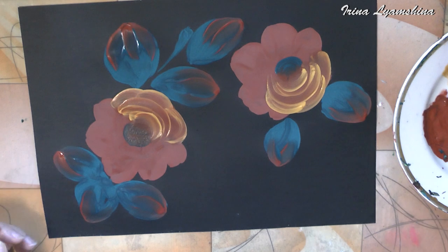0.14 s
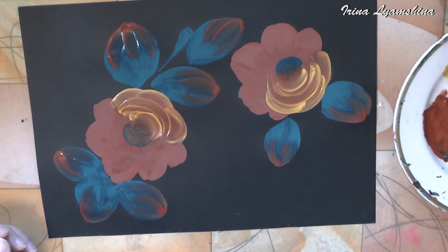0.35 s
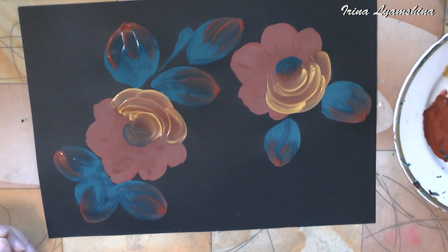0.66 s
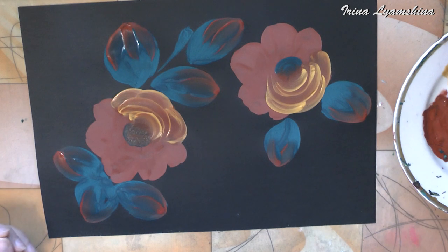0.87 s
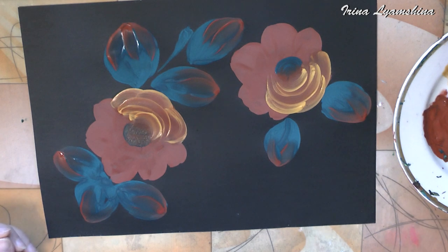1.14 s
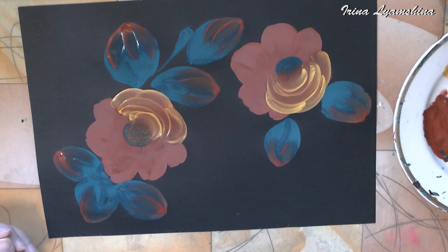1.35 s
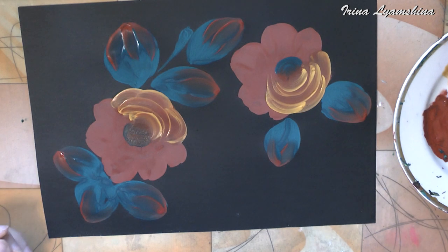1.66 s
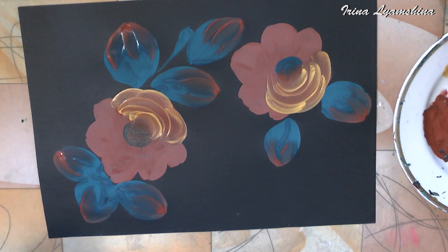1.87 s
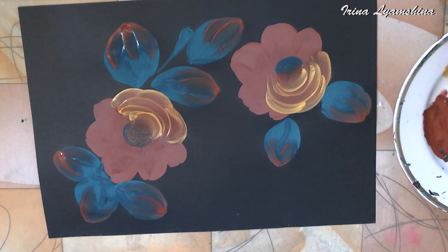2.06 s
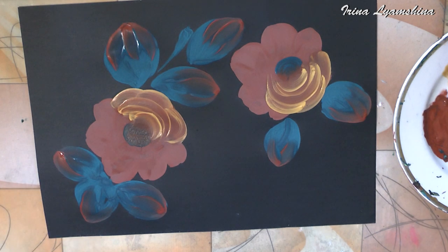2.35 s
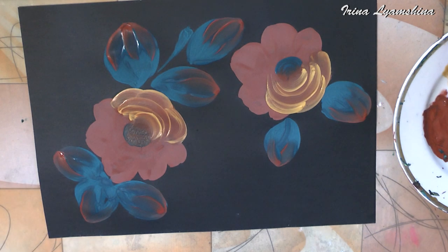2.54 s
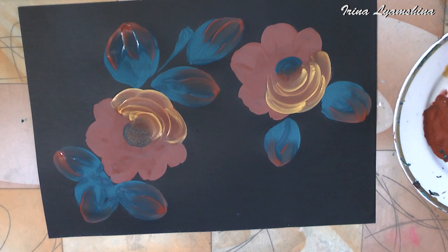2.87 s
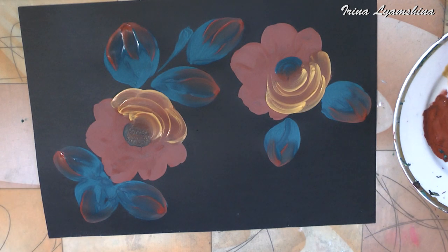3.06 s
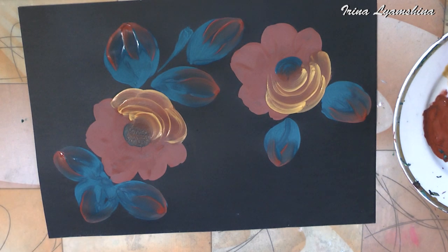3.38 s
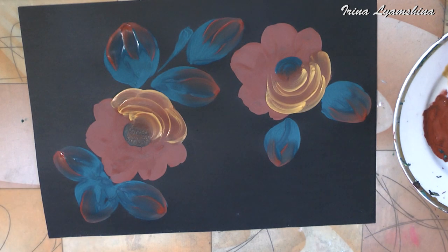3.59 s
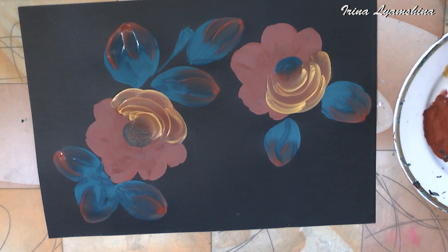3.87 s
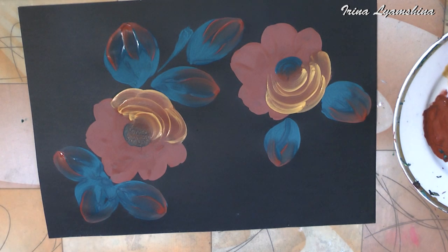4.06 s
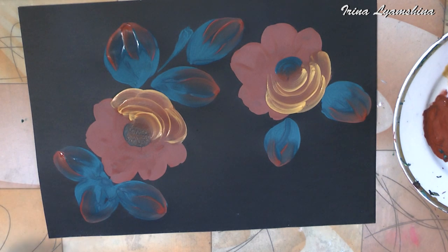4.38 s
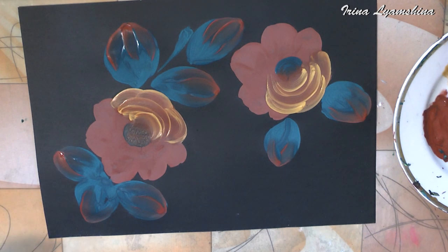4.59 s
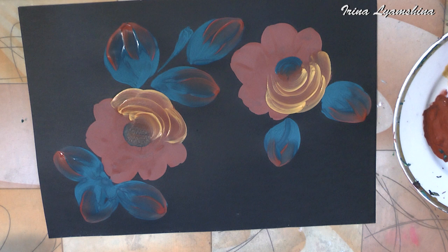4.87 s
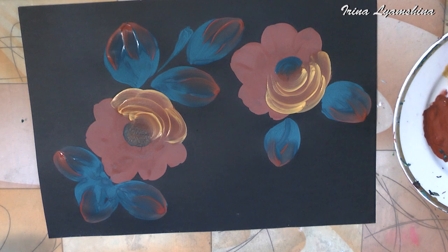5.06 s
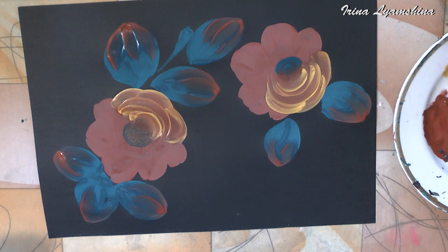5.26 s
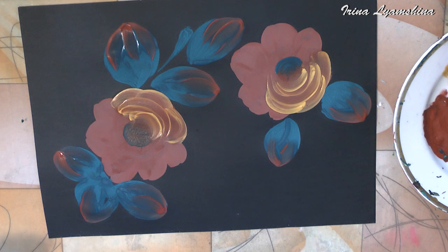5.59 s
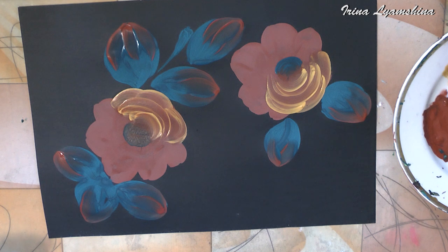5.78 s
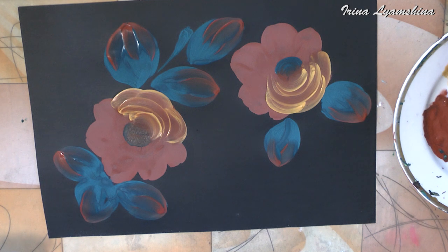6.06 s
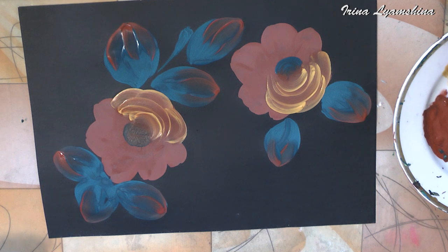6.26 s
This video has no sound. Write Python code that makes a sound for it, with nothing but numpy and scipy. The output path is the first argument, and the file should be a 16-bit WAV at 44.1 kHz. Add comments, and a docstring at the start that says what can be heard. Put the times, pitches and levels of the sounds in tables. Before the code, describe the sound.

Brush stirring water in a ringing jar, bristles scraping and the ferrule cracking on glass, a hand brushing paper, then a gentler second swish.

```python
"""At a desk in a small quiet room, a paintbrush is swished in a jar of water.
Slaps trap air pockets: short rising sines that plop or plink and ring the jar's modes; churned water is many more.
Droplets tick as pitched noise, bristles scrape in resonant clicks, and the ferrule knocks, scattering fine drops.
A hand slides over paper as banded noise, the desk top thuds at its low modes, and the room hums faintly below."""
import sys
import numpy as np
from scipy import signal
from scipy.io import wavfile
from scipy.ndimage import uniform_filter1d

SR = 44100
rng = np.random.default_rng(int(sys.argv[2]) if len(sys.argv) > 2 else 0)


def transcribe(u):
    """Save the signal u as a 16-bit wav file named by the first command-line argument.

    u: samples, shape (n,) or (channels, n), limited to [-1, 1]; the rate is SR.
    q: integer samples, one column per channel.
    """
    v = np.clip(np.atleast_2d(u).T, -1, 1)
    q = np.round(v * 32767).astype(np.int16)
    wavfile.write(sys.argv[1], SR, q)


N = 283563
GRAIN_SAMPLES = 640   # length of one pocket or tick
OPPOSED = np.array([[1], [-1]])   # signs in the left and right channels

# Ferrule hard on the glass. Each row: start in seconds, level in dB.
KNOCKS = [(1.1236, -22.5), (1.698, -4.5), (4.639, -31)]
# Vigour of the stirring hand, as churned water. Each row: time in seconds, level in dB.
STIR = [(0.0, -70), (.5, -68), (.91, -52), (1.32, -44.5), (1.48, -64.5), (1.77, -48.5), (1.9, -61.5),
        (2.08, -47), (2.2, -53), (2.69, -66.5), (3.37, -73), (4.21, -58), (4.33, -54.5), (4.78, -51),
        (5.07, -52.5), (5.16, -91), (5.3, -71), (5.34, -46), (5.4, -61), (5.44, -47), (5.49, -63),
        (5.75, -66), (6.43, -82)]


def amp(db):
    """Amplitude ratio of a level in dB."""
    return 10 ** (np.asarray(db) / 20)


def rms_one(x):
    """Scale to rms 1."""
    return x / np.sqrt(np.mean(x ** 2) + 1e-20)


def in_time(rows, **ends):
    """Interpolate each column of a table over the scene's samples; the first column is seconds."""
    times_s, *columns = np.transpose(rows)
    return [np.interp(np.arange(N) / SR, times_s, column, **ends) for column in columns]


def in_spans(tables):
    """Gain of a sound that follows its tables and drops at once to -120 dB outside them."""
    return sum(amp(in_time(rows, left=-120, right=-120)[0]) for rows in tables)


def at_hz(points, hz):
    """Interpolate a spectrum on a log frequency axis."""
    points_hz, values = np.array(points).T
    return np.interp(np.log(hz), np.log(points_hz), values)


def resonate(x, hz, width_hz):
    """Two-pole resonance with gain 1 on top."""
    r = np.exp(-np.pi * width_hz / SR)
    zeros = [(1 - r * r) / 2, 0, (r * r - 1) / 2]
    poles = [1, -2 * r * np.cos(2 * np.pi * hz / SR), r * r]
    return signal.lfilter(zeros, poles, x + 1e-18)


def bandpass(x, low_hz, high_hz):
    """Second-order Butterworth band-pass."""
    return signal.sosfilt(signal.butter(2, [low_hz, high_hz], "band", fs=SR, output="sos"), x)


def late(x, delay_s):
    """Delay a signal."""
    return np.pad(x, (round(delay_s * SR), 0))[:N]


def add(out, start_s, sound):
    """Mix in a short sound."""
    i = round(start_s * SR)
    out[i:i + len(sound)] += sound[:N - i]


def banded_noise(spectrum):
    """Third-octave bands of stereo noise, each with its own level and left-right likeness; rms 1."""
    # Each row: frequency in Hz, left-right likeness from 0 to 1.
    likeness = [(60, 0.71), (300, 0.25), (1200, 0.012), (3000, 0.41), (5500, 1), (8500, 0.82),
                (13000, 0.23)]
    out, edges_hz = 0, 22 * 2 ** (np.arange(30) / 3)
    white = rng.standard_normal((2, 2, N))
    for k, (low_hz, high_hz) in enumerate(zip(edges_hz, edges_hz[1:])):
        if high_hz < spectrum[0][0]:
            continue
        mid, side = bandpass(white[k % 2], low_hz, high_hz)   # neighbouring bands use different noise
        hz = np.sqrt(low_hz * high_hz)
        alike = at_hz(likeness, hz)
        stereo = np.sqrt(1 + alike) * mid + np.sqrt(1 - alike) * side * OPPOSED
        out = out + amp(at_hz(spectrum, hz)) * stereo
    return rms_one(out)


def room_tone():
    """Steady noise floor of the room, shaped in bands."""
    # Each row: frequency in Hz, density in dB per Hz (relative).
    spectrum = [(25, -18), (103, -0.5), (238, 2.5), (399, -8), (553, -2.5), (726, -24), (900, -23),
                (1430, -11), (2900, -13), (5000, -17.5), (9000, -18.5), (13000, -21), (16500, -22)]
    return amp(-54.5) * banded_noise(spectrum)


def hum():
    """Appliance tones: steady sines with narrow noise on them, so that they waver in level."""
    # Each row: frequency in Hz, level in dB, noise width in Hz.
    tones = [(98.3, -63.5, 4.5), (727, -72, 5.8)]
    t, out = np.arange(N) / SR, 0
    for hz, db, width_hz in tones:
        narrow = resonate(resonate(rng.standard_normal(N), hz, width_hz), hz, 3 * width_hz)
        out = out + amp(db) * rms_one(np.sin(2 * np.pi * hz * t) + 0.59 * rms_one(narrow))
    return out


def shaking():
    """Level of the desk top in dB: a tremble that follows the stirring, with a quick rise and fall at each bump."""
    # The jar bumps the desk top. Each row: time in seconds, level in dB.
    thuds = [(0.791, -42.5), (1.143, -39), (1.207, -40.5), (1.305, -38.5), (1.47, -52.5), (1.661, -48.5),
             (2.061, -40.5), (2.147, -34.5), (2.47, -49), (2.92, -49.5), (4.573, -39.5), (4.651, -44.5),
             (4.916, -44), (5.322, -52), (5.8, -52), (6.0, -53)]
    rise_db_per_s, fall_db_per_s = 537, 264
    t = np.arange(N) / SR
    gain = amp(in_time(STIR)[0] - 4)
    for peak_s, db in thuds:
        drop_db = np.maximum(rise_db_per_s * (peak_s - t), fall_db_per_s * (t - peak_s))
        gain = np.maximum(gain, amp(db - drop_db))
    return 20 * np.log10(gain)


def desk(level_db, water):
    """The shaken desk top answers at its low modes, harder at every slap; a shove rumbles lower."""
    # Each row: frequency in Hz, width in Hz, level in dB.
    modes = [(212.8, 41.6, 2), (250.8, 79, -2), (584, 40, -3.5), (729, 29.4, -1.5)]
    # Low rumble, one table per shove. Each row: time in seconds, level in dB.
    shoves = [
        [(3.6, -86), (3.692, -61), (3.85, -80)],
        [(4.05, -68), (4.182, -44), (4.4, -50.5), (4.75, -64)],
    ]
    shake, thud = rng.standard_normal((3, N)), 0
    drive = shake[0] + 0.32 * shake[1:]   # a common part and one per channel
    for hz, width_hz, db in modes:
        thud = thud + amp(db) * resonate(resonate(drive, hz, width_hz), hz, 2 * width_hz)
    jolt = uniform_filter1d(np.abs(resonate(water, 850, 770)), 600)
    rumble = rms_one(bandpass(shake[0] + 0.3 * shake[1:], 42, 95))
    return (amp(level_db) + 0.23 * jolt) * rms_one(thud) + in_spans(shoves) * rumble


def paper_slide():
    """A hand rubs over paper: banded noise under a moving level."""
    # One table per slide. Each row: time in seconds, level in dB.
    strokes = [
        [(0.0, -52), (0.124, -53.5), (0.25, -107)],
        [(2.1, -58.5), (2.464, -50.5), (2.624, -51), (2.78, -99)],
        [(3.62, -113), (3.678, -60.5), (3.992, -50.5), (4.3, -66)],
    ]
    # Each row: frequency in Hz, density in dB per Hz (relative).
    spectrum = [(700, -70), (1500, -9), (3000, -2), (7000, -2), (12000, -2.5), (16000, -17)]
    return in_spans(strokes) * banded_noise(spectrum)


def scrape():
    """Bristles on glass slip in uneven clicks; each stiff resonance catches and lets go in its own time."""
    # One table per scrape. Each row: time in seconds, level in dB.
    strokes = [
        [(0.66, -56), (0.685, -40), (0.77, -67), (0.8, -49.5), (0.89, -50), (1.12, -59)],
        [(1.13, -43), (1.4, -81)],
        [(3.31, -86), (3.55, -65), (3.75, -76)],
    ]
    # Each row: frequency in Hz, width in Hz, level in dB.
    bristles = [(3290, 38, 15.5), (4620, 50, 13.5), (4800, 66, 13.5), (6510, 250, 3), (7850, 3900, -9)]
    slips_per_s = 3000
    slips = (rng.random(N) < slips_per_s / SR) * rng.standard_normal(N)
    out = 0
    for hz, width_hz, db in bristles:
        grip = amp(4.4 * rms_one(resonate(rng.standard_normal(N), 14, 24)))
        out = out + amp(db) * resonate(slips * grip, hz, width_hz)
    return in_spans(strokes) * rms_one(out)


def pocket(hz, cycles, rise):
    """An air pocket swells and dies within a few cycles; a positive rise makes its pitch climb as it closes."""
    turns = np.arange(GRAIN_SAMPLES) * hz / SR
    swell = turns / cycles * np.exp(1 - turns / cycles)
    return swell * np.sin(2 * np.pi * turns * (1 + rise * turns))


def knocks():
    """Metal on glass: a broad crack of a few fast swings over a low push."""
    crack = pocket(3900, cycles=1.7, rise=0) + 0.51 * pocket(2230, cycles=1.96, rise=0)
    push = 0.029 * pocket(144, cycles=0.56, rise=0)
    out = np.zeros(N)
    for start_s, db in KNOCKS:
        add(out, start_s, amp(db) * (crack + push))
    return out


def spatter():
    """Water thrown up by each knock falls back in tiny drops of every pitch, thinning out."""
    level_db, t60_s = -25, 0.16
    out = np.zeros(N)
    for start_s, db in KNOCKS:
        for wait, pitch, size in rng.random((60, 3)):
            wait_s = 0.003 + 0.08 * wait ** 2
            drop = 2 * size * pocket(1500 * 6.0 ** pitch, cycles=2.1, rise=0)
            add(out, start_s + wait_s, amp(db + level_db - 60 * wait_s / t60_s) * drop)
    return out


def plop(hz, cycles, rise):
    """A pinched-off pocket starts at once and rings out on its pitch, climbing a little."""
    turns = np.arange(GRAIN_SAMPLES) * hz / SR
    onset = (1 - np.exp(-turns / (0.095 * cycles))) ** 2   # a small share of the dying time
    ring = np.exp(-turns / cycles) * np.sin(2 * np.pi * turns * (1 + rise * turns))
    return 1.424 * onset * ring


def slaps():
    """Trapped pockets ring, small ones for more cycles; droplets and bursting foam tick as pitched noise."""
    # Air pockets trapped by the brush. Each row: start in seconds, level in dB, pitch in Hz.
    pockets = [(0.0375, -39.5, 2530), (0.037, -31.5, 4260), (0.3644, -34, 1400), (.4649, -40, 2100),
               (0.466, -34, 3160), (0.5847, -30, 1620), (0.589, -34, 2340), (0.6858, -31.5, 2310),
               (0.6866, -26.5, 4400), (0.7832, -31, 1075), (0.7803, -28.5, 4430), (0.832, -33.5, 1060),
               (0.793, -36, 1850), (1.02, -36, 1450), (0.848, -29, 4770), (0.86, -28, 1220),
               (.85, -33, 2140), (0.879, -25, 1003), (0.878, -29.5, 2560), (0.937, -31, 1890),
               (0.969, -33, 1390), (0.969, -24, 3110), (1.028, -28, 2450), (1.035, -26.5, 3120),
               (0.891, -30, 4370), (1.061, -21, 1317), (1.1232, -19.5, 2790), (1.123, -17, 4030),
               (1.192, -25.5, 1140), (1.218, -29.5, 1970), (1.2185, -28, 4180), (1.2885, -32, 2170),
               (1.295, -19, 1230), (1.345, -33.5, 1470), (1.404, -20, 1297), (1.4054, -18.5, 2575),
               (1.4555, -27.5, 1190), (1.55, -34, 1530), (1.655, -26, 1137), (1.698, -14.5, 1300),
               (1.7858, -35, 2800), (1.805, -27.5, 1105), (1.784, -24, 2100), (1.7854, -20, 4540),
               (1.814, -25.5, 995), (1.8107, -33, 2950), (1.953, -30, 2680), (1.9535, -26.5, 3690),
               (1.961, -35, 1700), (1.961, -26.5, 2890), (1.975, -27.5, 4540), (2.0245, -32, 1910),
               (2.025, -22.5, 3060), (2.056, -23.5, 1300), (2.065, -24, 1360), (2.053, -35, 2710),
               (2.126, -22.5, 1225), (2.1224, -27.5, 4650), (2.1195, -33, 2010), (2.119, -30.5, 3640),
               (2.1386, -21.5, 1106), (2.1403, -33, 3100), (2.233, -30.5, 1330), (2.285, -33, 1290),
               (2.306, -38.5, 1370), (2.176, -36, 1140), (2.3254, -37, 1830), (2.3934, -20, 1204),
               (2.3934, -23, 1600), (2.449, -31, 2270), (2.579, -31.5, 2330), (2.649, -37.5, 2550),
               (2.802, -44.5, 1820), (2.912, -25.5, 1090), (2.946, -33.5, 1340), (2.9457, -36.5, 2340),
               (3.0821, -37.5, 2190), (3.081, -40.5, 1270), (3.324, -50, 3150), (3.325, -45, 4730),
               (3.3554, -37.5, 4670), (3.419, -32.5, 2000), (3.4194, -41, 3070), (3.4193, -38.5, 1340),
               (3.59, -47.5, 2950), (3.4378, -36, 2410), (3.55, -46.5, 2960), (3.549, -44, 4300),
               (3.697, -31.5, 4530), (3.697, -40.5, 3320), (3.7688, -27, 1510), (3.771, -32.5, 3980),
               (3.983, -39, 1530), (4.122, -24.5, 1340), (4.1234, -34.5, 2160), (4.1323, -33, 1890),
               (4.132, -33.5, 3130), (4.172, -20.5, 1217), (4.2017, -37.5, 1214), (4.292, -29.5, 1330),
               (4.318, -32, 2140), (4.319, -37, 1510), (4.37, -36, 1560), (4.396, -34, 3100),
               (4.3808, -17.5, 1130), (4.381, -20.5, 3800), (4.382, -36, 2910), (4.545, -38, 2950),
               (1.306, -33.5, 3000), (4.468, -42, 2820), (4.4758, -22.5, 1320), (4.5333, -30.5, 1020),
               (4.557, -18.5, 1020), (4.555, -22, 2704), (4.569, -23, 1290), (4.5716, -18, 3990),
               (4.6376, -29.5, 1400), (4.6377, -31.5, 2470), (4.652, -28.5, 1530), (4.6537, -31.5, 2960),
               (4.7064, -36.5, 1330), (4.7666, -23, 2294), (4.767, -30, 2620), (4.789, -34.5, 1390),
               (4.8, -38, 1980), (4.823, -22, 4680), (4.8342, -26.5, 1080), (4.8945, -18, 1346),
               (4.8934, -25.5, 2920), (4.9028, -19, 1190), (4.913, -23, 750), (4.9559, -33, 1110),
               (4.956, -33, 4630), (5.057, -39.5, 3140), (5.327, -33.5, 1130), (5.4313, -38, 1420),
               (5.523, -42, 3380), (5.613, -33.5, 2120), (5.613, -30, 4300), (5.6397, -39.5, 2720),
               (5.6717, -37, 3060), (5.6948, -29.5, 1573), (5.761, -39, 1160), (5.736, -43.5, 2950),
               (5.78, -28.5, 2330), (5.7784, -28.5, 3060), (5.789, -23, 1470), (5.793, -39, 2870),
               (5.863, -41, 3060), (5.9714, -31.5, 2166), (5.973, -27, 3800), (5.974, -42, 1230),
               (6.0816, -44.5, 2240), (6.0805, -41, 4340), (6.1094, -32.5, 1030), (6.168, -39, 1520),
               (6.177, -41, 1810), (6.367, -39.5, 1190), (6.366, -31, 2130), (6.366, -35, 2730)]
    # Droplets ticking on the glass. Each row: start in seconds, level in dB, pitch in Hz.
    ticks = [(0.0372, -38, 9900), (0.3684, -45.5, 8250), (0.7826, -37.5, 5540), (0.88, -49, 6040),
             (1.1177, -33.5, 7460), (1.1217, -34, 5840), (1.2367, -37, 7700), (1.2873, -31.5, 6950),
             (1.2968, -33, 6200), (1.46, -47, 6350), (1.5523, -47.5, 6000), (1.654, -35.5, 7200),
             (1.6556, -42, 5900), (1.6978, -18, 6430), (1.785, -39.5, 5740), (1.964, -42.5, 5670),
             (2.055, -42, 7300), (2.1092, -44, 5030), (2.121, -36.5, 6170), (2.14, -38, 5500),
             (2.326, -43.5, 9600), (2.578, -36.5, 12000), (2.803, -51, 8500), (2.963, -49.5, 9400),
             (3.193, -51, 10600), (3.25, -44, 8400), (3.4196, -49.5, 8600), (3.6095, -48.5, 7150),
             (4.2017, -43.5, 7250), (4.296, -44.5, 7360), (4.3795, -43.5, 7100), (4.405, -50, 7860),
             (4.5, -46, 5850), (4.56, -41, 10100), (4.568, -37.5, 5570), (4.6385, -27.5, 7400),
             (4.7669, -40, 5270), (4.977, -49, 7440), (5.613, -47, 7500), (5.7782, -42, 6800),
             (5.791, -43, 5700), (5.9717, -46.5, 5400), (6.092, -41.5, 6060), (6.368, -42.5, 9100)]
    fizz_top_db = -48.5
    snap_db, spray_db = -4.5, -25.5   # relative to the pocket
    out, t = np.zeros(N), np.arange(GRAIN_SAMPLES) / SR
    white = rng.standard_normal((len(ticks) + len(pockets), GRAIN_SAMPLES))
    grit = bandpass(white, 5000, 11500) * np.exp(-t / 0.0073)
    for (start_s, db, hz), noise in zip(ticks, grit):
        add(out, start_s, amp(db) * (1.85 * noise + 4.33 * pocket(hz, cycles=2.5, rise=0.00043)))
    # foam bursts at random times
    for (when, size, pitch), noise in zip(rng.random((90, 3)), grit):
        burst = noise + 2 * pocket(4000 * 2.8 ** pitch, cycles=4.6, rise=0)
        add(out, when * N / SR, amp(fizz_top_db - 12 * size) * burst)
    for (start_s, db, hz), spray in zip(pockets, grit[len(ticks):]):
        cycles = 5.1 * (hz / 1400) ** 0.29
        snap = pocket(hz, cycles=0.4, rise=0)   # the surface snaps shut in a broad click
        slap = plop(hz, cycles, rise=0.0011) + amp(snap_db) * snap + amp(spray_db) * spray
        add(out, start_s, amp(db) * slap)
    return out


def churn(level_db, blows):
    """Stirred water bursts small pockets densely and at random, of uneven size and pitch; each slap stirs up more."""
    settle_s = 0.0055   # time constant of the calming after a slap
    out = np.zeros(N)
    for when, pitch, size in rng.random((4500, 3)):
        hz = 900 * 8.0 ** (pitch ** 1.5)
        level = amp(-2.5 * np.log(size + 0.015))
        add(out, when * N / SR, level * pocket(hz, cycles=6.5, rise=0.0008))
    calm = np.exp(-1 / (settle_s * SR))
    stirred = signal.lfilter([1 - calm], [1, -calm], np.abs(blows))
    return (amp(level_db) + 0.28 * stirred) * rms_one(out)


def jar(x):
    """The jar and the air above its water: the direct sound, with every mode ringing on."""
    # Each row: frequency in Hz, level in dB, t60 in seconds.
    modes = [(784, 2, 0.37), (942, 0.5, 0.014), (1205.7, 3, 0.067), (1385, 10.5, 0.034),
             (1483, -0.5, 0.024), (1654, 15.5, 0.094), (1870, 7, 0.1), (1925, 13, 0.21), (2086, 8, 0.048),
             (2260, 13, 0.11), (2862, 8.5, 0.024), (3070, 12.5, 0.14), (3260, 10, 0.14)]
    rings = 0
    for k, (hz, db, t60_s) in enumerate(modes):
        width_hz = np.log(1000) / (np.pi * t60_s)
        rings = rings + (-1) ** k * amp(db) * resonate(x, hz, width_hz)
    return x + rings


def room(x):
    """Dense returns as decaying noise, largely alike in both channels."""
    # Clutter on the desk, then walls. Each row: start in seconds, level in dB, t60 in seconds, cutoff in Hz.
    echoes = [(.008, -15.5, 0.15, 14200), (0.01, -23.5, 0.39, 7100)]
    t, tail = np.arange(SR // 2) / SR, 0
    for start_s, db, t60_s, cut_hz in echoes:
        lowpass = signal.butter(1, cut_hz, fs=SR, output="sos")
        mid, side = signal.sosfilt(lowpass, rng.standard_normal((2, len(t))))
        fade = (t > start_s) * amp(-60 * t / t60_s)
        fade = fade / np.sqrt(np.sum(fade ** 2))
        tail = tail + amp(db) * fade * (mid + 0.33 * side * OPPOSED)
    return signal.fftconvolve(x[None], tail, axes=1)[:, :N]


def scene():
    """The jar, a little to the left, returns off the desk a moment later, unequally in the two channels."""
    blows = slaps() + spatter()
    splash = blows + churn(*in_time(STIR), blows)
    water = amp(-5.5) * jar(splash) + scrape() + 0.66 * knocks()
    left = amp(0.4) * water + 0.78 * resonate(water, 3200, 3800)   # the nearer side favours the upper mids
    near = np.array([left + 0.016 * late(left, 0.01), water + 0.39 * late(water, 0.01)])
    # the treble arrives unevenly on the two sides
    near = near + 0.65 * resonate(late(water, 0.00021), 13800, 3700) * OPPOSED
    returns = room(1.94 * water + 1.11 * splash)
    slide = amp(0.7 * OPPOSED) * paper_slide()
    background = amp(0.4 * OPPOSED) * (room_tone() + hum())
    return near + returns + slide + desk(shaking(), water) + background


def record(dry):
    """The microphone drops the deepest bass; the top is cut steeply."""
    dry = signal.sosfilt(signal.butter(2, 45, "high", fs=SR, output="sos"), dry)
    return signal.sosfilt(signal.cheby2(12, 60, 16500, fs=SR, output="sos"), dry)


dry = scene()
out = record(dry)
transcribe(out)
```